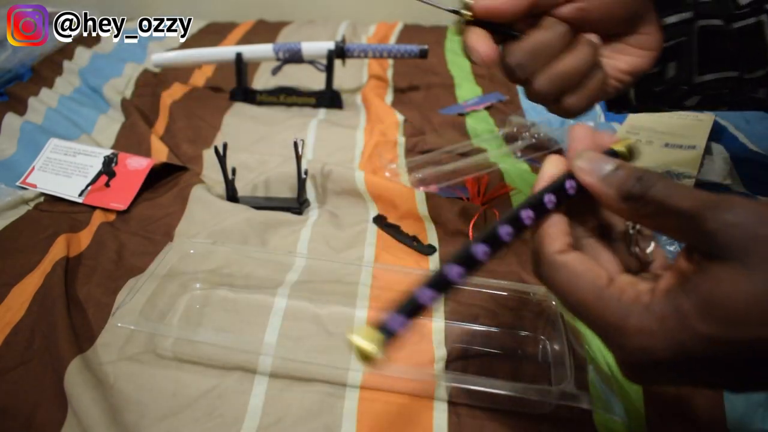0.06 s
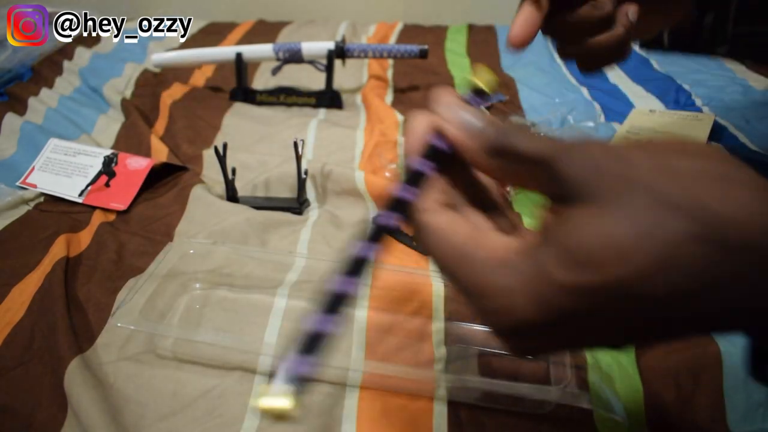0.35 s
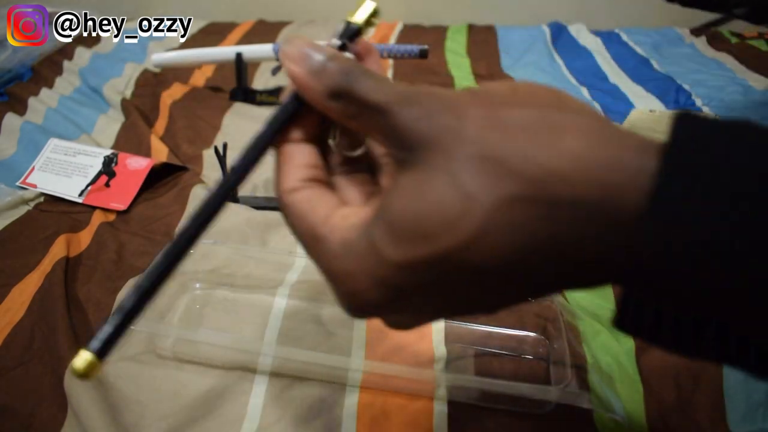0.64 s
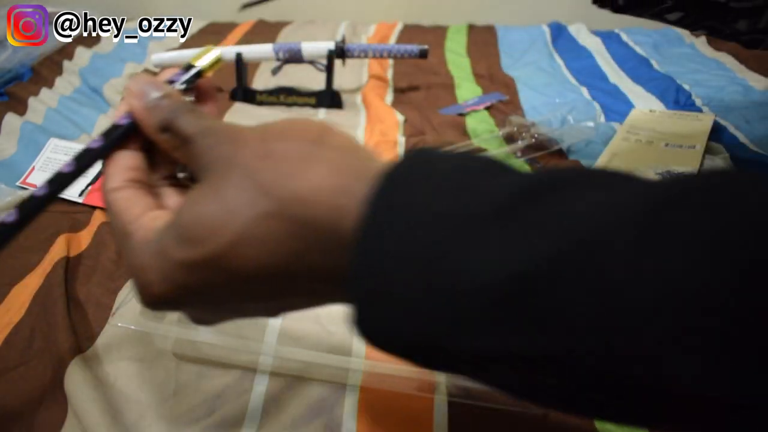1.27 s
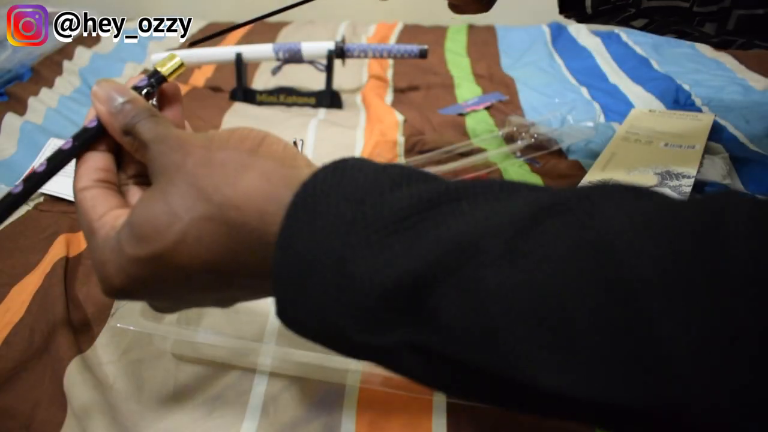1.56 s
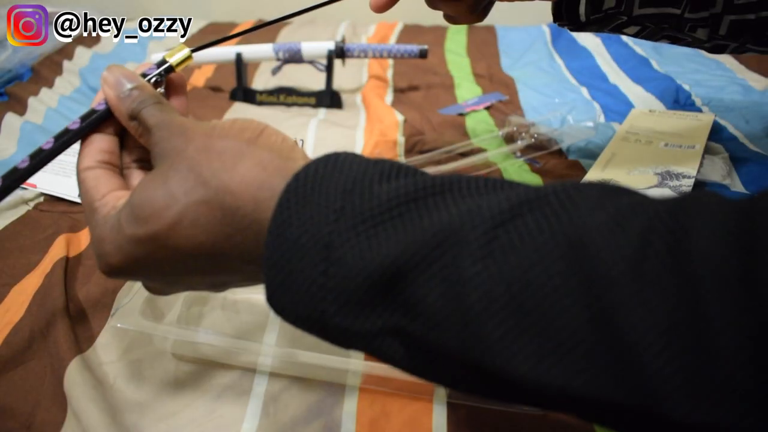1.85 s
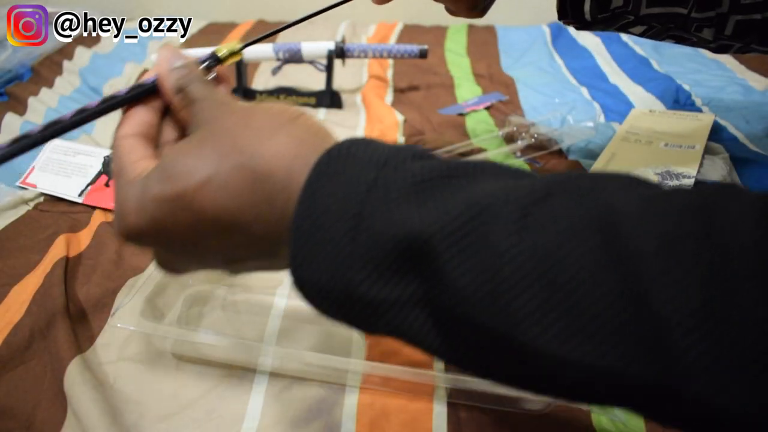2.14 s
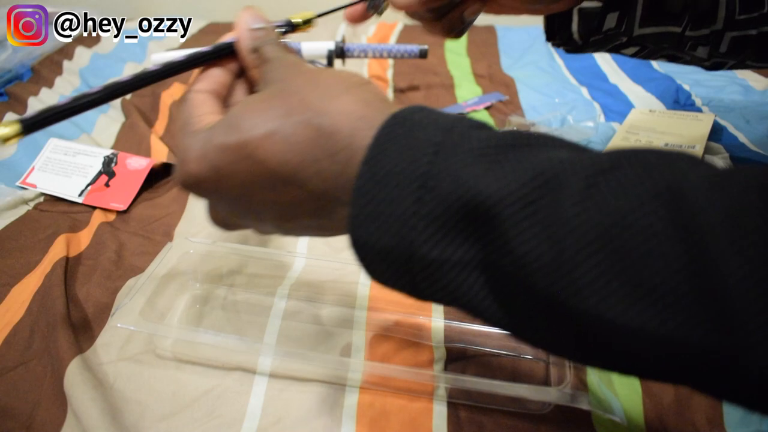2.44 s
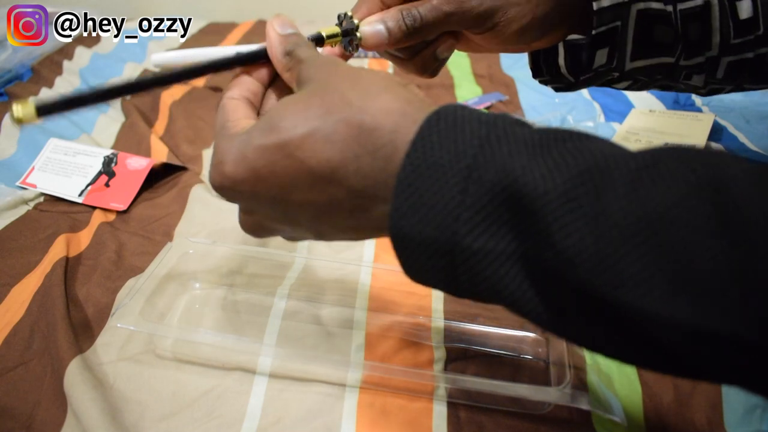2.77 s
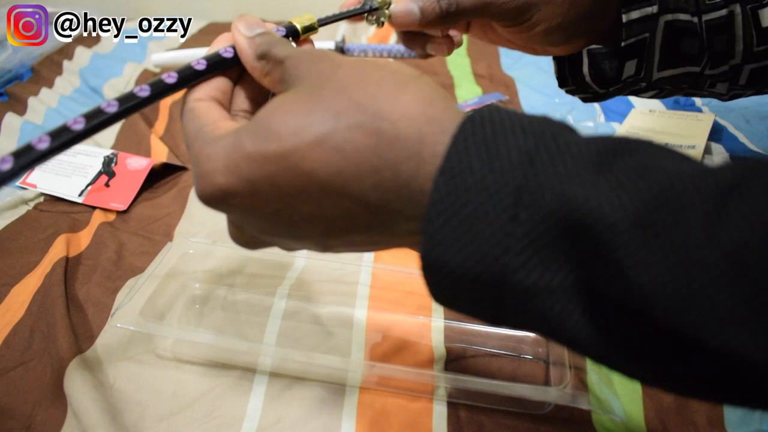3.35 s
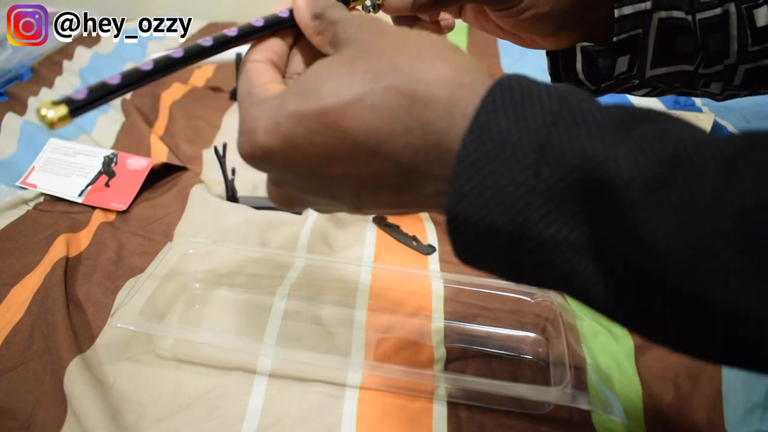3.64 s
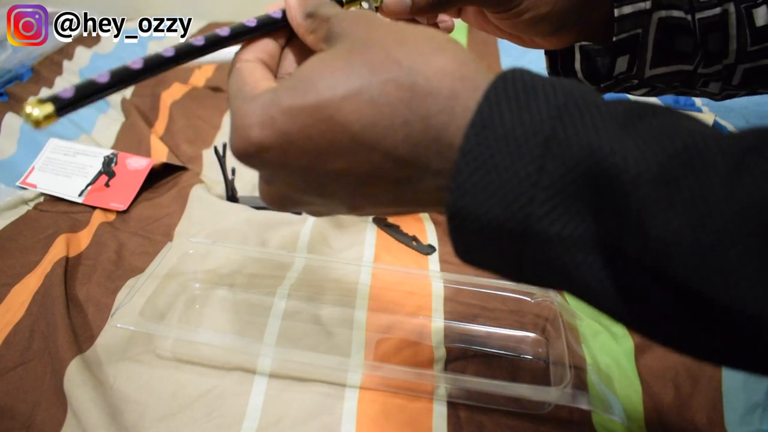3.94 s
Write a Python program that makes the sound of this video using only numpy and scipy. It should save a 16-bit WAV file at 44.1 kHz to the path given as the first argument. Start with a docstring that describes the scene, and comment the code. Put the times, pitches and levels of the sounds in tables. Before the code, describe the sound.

A miniature sword slides in and out of its scabbard, close up in a quiet room. Its fittings jingle at the start, followed by soft sleeve brushing and finger taps. The tip ticks around 1.8 seconds, then the blade scrapes in slowly, ringing thinly, and clacks home at 2.6. It scrapes out at 3.2, slides briskly back with a louder clack at 3.6, and clicks tight at 3.8.

```python
"""Sheathing a miniature sword

A tiny sword is handled close by, over a bed in a quiet room. Its fittings jingle, a sleeve brushes,
fingers tap the scabbard and the blade tip feels for the mouth. The blade scrapes home and seats with a
clack, is drawn, pushed home again, and clicks tight. Each knock is a burst of tiny collisions ringing
one part; each scrape is catch-and-slip friction through resonances that shift as the blade travels."""
import sys
import numpy as np
from scipy import signal
from scipy.fft import rfft, irfft
from scipy.io import wavfile
from scipy.ndimage import uniform_filter1d

SR = 44100
rng = np.random.default_rng(int(sys.argv[2]) if len(sys.argv) > 2 else 0)


def generate_wav(signal):
    """Clip the signal to [-1, 1] and save it as 16-bit WAV at the path in sys.argv[1]."""
    frames = np.transpose(np.atleast_2d(signal))
    scaled = np.clip(frames, -1, 1) * 32767
    pcm = np.round(scaled).astype(np.int16)
    wavfile.write(sys.argv[1], SR, pcm)


N = 176400


def amp(db):
    """Decibels to gain."""
    return 10 ** (np.asarray(db) / 20)


def unit(x):
    """Scales to rms 1."""
    return x / np.sqrt(np.mean(x ** 2) + 1e-20)


def read(points, hz):
    """Reads a curve on a log-frequency axis."""
    f, value = np.transpose(points)
    return np.interp(np.log(hz + 1), np.log(f + 1), value)


def envelope(points):
    """Gain from (time [s], level [dB]) points, silent outside them."""
    s, db = np.transpose(points)
    return amp(np.interp(np.arange(N) / SR, s, db, left=-200, right=-200))


def add(mix, s, sound):
    """Mixes a sound in at s seconds."""
    part = mix[max(round(s * SR), 0):][:len(sound)]
    part += sound[:len(part)]


def shade(x, points):
    """Equalises a sound by (frequency [Hz], gain [dB]) points."""
    size = x.shape[-1]
    return irfft(rfft(x) * amp(read(points, np.fft.rfftfreq(size, 1 / SR))), size)


def spread(pair, side_colour):
    """Left and right from a mid signal and a coloured side signal."""
    side = shade(pair[1], side_colour)
    return np.array([pair[0] + side, pair[0] - side])


def body(colour, modes, ripple_db, tilt=((1, 0), (2, 0)), size=4096, ripple_hz=200):
    """A part's impulse response: broad colour, main resonances and a random ripple of fine ones."""
    hz = np.fft.rfftfreq(size, 1 / SR)
    peaks = 0
    for centre, width, db in modes:
        skirt = np.exp(-((hz - centre) / (.5 * centre)) ** 2)
        peaks += (amp(abs(db)) ** 2 - 1) / (1 + (2 * (hz - centre) / width) ** 2) * skirt
    grain = np.hanning(round(ripple_hz / hz[1]))
    ripple = np.convolve(rng.standard_normal(len(hz)), grain, "same")
    ripple -= uniform_filter1d(ripple, size=3 * len(grain))
    ripple = 2 * np.tanh(unit(ripple) / 2)
    gain = amp(read(colour, hz) + read(tilt, hz) + ripple_db * ripple) * np.sqrt(1 + peaks)
    # Minimum phase: nothing rings before the strike
    cepstrum = irfft(np.log(gain))
    cepstrum[1:size // 2] *= 2
    cepstrum[size // 2 + 1:] = 0
    return irfft(np.exp(rfft(cepstrum)))


def chatter(decay_ms, rise_ms=.57, size=4096):
    """A dying burst of tiny collisions with an even spectrum and unit energy."""
    ms = np.arange(size) * 1000 / SR
    shape = (1 - np.exp(-(ms / rise_ms) ** 2)) * np.exp(-ms / decay_ms)
    spectrum = rfft(shape * rng.standard_normal(size))
    burst = irfft(spectrum / (abs(spectrum) + 1e-12)) * shape ** .25
    return burst / np.linalg.norm(burst)


def contacts(hits, colour, modes, width_hz, room_share=1, ripple_db=2.6, span_s=.0047):
    """Hits ring one part, each contact point favouring a resonance. Returns (close, room send)."""
    out = np.zeros((2, N))
    for s, db, decay_ms, bass_db, treble_db, hz, lift_db in hits:
        tilt = [(1400, bass_db), (2400, 0), (4200, 0), (8500, treble_db)]
        burst = chatter(decay_ms)
        # The room hears a part from all sides: a share below 1 softens its resonances there
        for path, share in zip(out, (1, room_share)):
            rings = np.array(modes + [(hz, width_hz, lift_db)]) * [1, 1, share]
            hit = signal.fftconvolve(burst, body(colour, rings, share * ripple_db, tilt))
            # db sets the rms the hit would have if packed into span_s
            add(path, s, amp(db) * hit / np.linalg.norm(hit) * np.sqrt(span_s * SR))
    return out


def catches(per_s=1500, spread_db=3):
    """Random tiny snags of uneven size, rms 1."""
    snags = (rng.random(N) < per_s / SR) * rng.choice([-1, 1], N)
    return unit(snags * amp(spread_db * np.minimum(rng.exponential(1, N), 4)))


def bandpass(x, low_hz, high_hz):
    """One band of a sound, rms 1."""
    return unit(signal.sosfilt(signal.butter(2, [low_hz, high_hz], "band", fs=SR, output="sos"), x))


def scrape(stroke, colour, modes, inward=True, room_share=.65, ripple_db=3.2, hop_s=.05):
    """The edge catches and slips; resonances sag as the blade goes deeper. Returns (close, room send)."""
    judder_db, swell_db = 1.36, 2.5
    sag_share, wander_share = .02, .008  # of each resonance's pitch
    rub = catches() + rng.standard_normal(N)  # equal parts snag and smooth hiss
    judder = bandpass(rng.standard_normal(N), 36, 144)
    force = unit(rub * amp(judder_db * judder)) * envelope(stroke)
    travel = np.interp(np.arange(N) / SR, [stroke[0][0], stroke[-1][0]], [0, 1])
    depth = travel if inward else 1 - travel
    hz, width, lift_db = np.transpose(modes)
    out, hop = np.zeros((2, N)), round(hop_s * SR)
    for at in range(0, N - 2 * hop, hop):
        # The contact point moves, so each grain rings a little differently
        wander, swell = np.clip(rng.standard_normal((2, len(modes))), -2, 2)
        moved_hz = hz * (1 + sag_share * (.5 - depth[at + hop]) + wander_share * wander)
        grain = force[at:at + 2 * hop] * np.sqrt(np.hanning(2 * hop))
        for path, share in zip(out, (1, room_share)):
            rings = zip(moved_hz, width / share, (lift_db + swell_db * swell) * (1 + share) / 2)
            ring = body(colour, rings, share * ripple_db, size=1024)
            add(path, at / SR, signal.fftconvolve(grain, ring / np.linalg.norm(ring)))
    return out


def room_tone(noise_db=-61, hum_hz=191, hum_db=-83):
    """Steady room noise with a faint hum."""
    # Colour of the noise and of its stereo side: (frequency [Hz], gain [dB])
    colour = [(10, -32), (30, -7), (60, -12), (92, -12.5), (140, -15.5), (190, -13), (270, -18.5),
              (451, -11), (887, -8), (1290, -10.5), (1610, -13.5), (2480, -15), (6560, -22.5), (16000, -34)]
    side_colour = [(30, -21), (100, -2.5), (300, -11.5), (1200, -6.5), (3000, 0), (8000, -1.5),
                   (15000, -1.5)]
    noise = unit(shade(rng.standard_normal((2, N)), colour))
    hum = unit(np.sin(2 * np.pi * hum_hz * np.arange(N) / SR))
    return amp(noise_db) * spread(noise, side_colour) + amp(hum_db) * hum


def hands(roughness_db=7.7, bump_s=1.175, bump_decay_s=.03):
    """Cloth and skin brush softly; the hand gives one dull bump."""
    # Swells of sleeve and fingers: (time [s], level [dB])
    swells = [(0, -62), (.15, -57.5), (.3, -50.5), (.48, -51), (.7, -67.5), (1.1, -88), (1.19, -49.5),
              (1.28, -72), (1.42, -59.5), (1.48, -46), (1.6, -66), (2.0, -60)]
    # Colour of the brushing and of the bump: (frequency [Hz], gain [dB])
    cloth_colour = [(100, -37), (300, -0.5), (600, 3.5), (1200, 6), (2500, 3), (5000, -6.5), (10000, -12),
                    (16000, -40)]
    bump_colour = [(10, -30), (35, -12), (70, 0), (200, -9), (400, -6), (700, -8), (1500, -25), (8000, -60)]
    friction = rng.standard_normal(N) * amp(roughness_db * rng.standard_normal(N))
    brush = unit(shade(friction, cloth_colour)) * envelope(swells)
    age = np.arange(N) / SR - bump_s
    bump = unit(shade(rng.standard_normal(N), bump_colour)) * (age > 0) * np.exp(-abs(age) / bump_decay_s)
    return brush + amp(-46.5) * bump


def fitting_jingle():
    """The fittings knock together with a bright, narrow ring."""
    # One quick cluster of clinks:
    # (time [s], level [dB], decay [ms], bass [dB], treble [dB], favoured ring [Hz], lift [dB])
    clinks = [(.0025, -34.5, 3.2, 5, 3, 3460, 12), (.0095, -40, 1.5, -5, 5, 7050, 10),
              (.0192, -37, 22, -9, 3, 3650, 18), (.0465, -31.5, 14, -10, 2.5, 5340, 19),
              (.065, -35.5, 13, -1, 3, 5460, 22.5)]
    # Colour of the fittings: (frequency [Hz], gain [dB])
    colour = [(300, -16), (1500, -13), (2500, 3), (6000, -1), (10000, -5.5), (12000, -9), (16000, -18)]
    # Their resonances: (frequency [Hz], width [Hz], lift [dB])
    modes = [(2400, 86, 9.5), (3510, 61, 9.5), (7000, 71, 13.5), (9400, 230, 19), (12000, 36, 8),
             (14370, 100, 5)]
    return contacts(clinks, colour, modes, width_hz=29)


def scabbard_taps():
    """Fingers tap the scabbard and its shell rings briefly."""
    # Light finger contacts:
    # (time [s], level [dB], decay [ms], bass [dB], treble [dB], favoured ring [Hz], lift [dB])
    taps = [(.196, -50, 2.4, 9, -4, 2380, 4.9), (.2795, -46, 3.9, -11, -23, 2370, 26),
            (.4698, -40, 2, -2, -2, 2470, 8.3), (.4865, -39, 14, -23, 4, 5000, 3),
            (.6085, -46, 1.6, -8, 11, 4200, 17), (.6262, -46, 11, -19, 10, 5300, 3.3),
            (1.167, -45.5, 2.9, -8, 1, 2450, 3), (1.178, -44.5, 3.2, -9, -26, 2400, 25),
            (1.326, -48, 2.3, 8, 4, 5300, 4), (1.346, -47.5, 1.1, 12, 7, 5300, 3.6),
            (1.44, -46, 5.3, 6, 0, 1100, 24), (1.4718, -41, 3.4, 2.5, 0, 1100, 24.7),
            (1.501, -44, 3.5, 11, -7, 1140, 18), (1.538, -50.5, 2.2, 14, 3, 4100, 3),
            (1.58, -51.5, 2.2, 17, 5, 7100, 4), (1.6775, -50, 2.8, -3, 2, 7100, 4),
            (1.694, -49, 2.3, 13, -13, 2400, 3), (3.0572, -48.5, 1.2, 4, -8, 3150, 16),
            (3.8915, -42.5, 2.9, 6, -17, 2100, 13)]
    # Colour of the shell: (frequency [Hz], gain [dB])
    colour = [(200, -42), (600, -28), (1300, -7), (2500, -4.5), (5000, -3.5), (8000, -11), (11000, -20),
              (16000, -39)]
    # Its resonances: (frequency [Hz], width [Hz], lift [dB])
    modes = [(2384, 180, 15), (4170, 110, 6), (5170, 310, 9.6), (7060, 140, 7.3)]
    return contacts(taps, colour, modes, width_hz=180)


def blade_ticks():
    """The blade ticks against the scabbard, first as its tip feels for the mouth."""
    # Contacts that ring the blade:
    # (time [s], level [dB], decay [ms], bass [dB], treble [dB], favoured ring [Hz], lift [dB])
    ticks = [(1.7168, -40.5, 1.8, -4, -7, 2240, 4.7), (1.761, -42.5, 17, 10, -11, 7050, 27),
             (1.7982, -26.5, 13, 2.5, 8, 13390, 8), (1.8514, -35, 1, 0, -2, 7430, 23),
             (1.8526, -32.5, 1.4, 6, -6, 3180, 19), (2.0688, -36.5, 0.98, 2, -11, 3350, 10),
             (2.079, -40, 1.5, 2, -29, 3270, 9.6), (2.1058, -36.5, 7.6, 11, 2.5, 8660, 21),
             (2.9988, -37.5, 1.3, 8, -8, 3240, 17), (3.1165, -44, 1.5, -3, 3, 9170, 18)]
    # Colour of the blade: (frequency [Hz], gain [dB])
    colour = [(300, -28), (800, -18), (1400, 1.5), (3000, 12.5), (5500, 4), (8500, 3.5), (12000, -5),
              (16000, -23)]
    # Its resonances: (frequency [Hz], width [Hz], lift [dB])
    modes = [(2350, 300, 4), (3670, 120, 9), (6891, 120, 7), (7450, 150, 4), (8600, 260, 9),
             (9986, 130, 10), (10850, 120, 10), (13390, 80, 16)]
    return contacts(ticks, colour, modes, width_hz=130)


def blade_pushes():
    """The blade rubs down the scabbard's bore twice, slowly and then briskly."""
    # Rubbing along each stroke: (time [s], level [dB])
    slow_stroke = [(2.03, -56), (2.06, -48.5), (2.125, -50.5), (2.19, -37.5), (2.26, -36.5), (2.29, -36.5),
                   (2.33, -36.5), (2.36, -33), (2.39, -38), (2.42, -35), (2.48, -36.5), (2.54, -32.5),
                   (2.58, -31), (2.6, -48)]
    brisk_stroke = [(3.415, -71), (3.437, -33), (3.47, -43), (3.51, -39), (3.555, -31.5), (3.58, -43),
                    (3.59, -55)]
    # Colour of the inward scrape: (frequency [Hz], gain [dB])
    colour = [(200, -59), (600, -19), (900, -4.5), (1200, -3), (1700, 1.5), (3200, 8.5), (4600, -4),
              (6200, -1.5), (9000, -8), (12000, -19), (16000, -20)]
    # Bore resonances when pushing: (frequency [Hz], width [Hz], lift [dB])
    modes = [(1225, 118, 8.8), (2180, 300, 3.6), (3020, 120, 6.4), (3700, 220, 8.2), (4000, 270, 12),
             (5020, 260, 9.4), (7070, 160, 13.2), (7600, 500, 7.2), (8770, 450, 12), (10000, 260, 4.3),
             (10800, 420, 11.4)]
    return scrape(slow_stroke, colour, modes) + scrape(brisk_stroke, colour, modes)


def blade_song(hz=9470, width_hz=380):
    """Snags at the tip keep one thin, high resonance of the bare blade ringing."""
    # The song swells until the scabbard damps it: (time [s], level [dB])
    swells = [(2.14, -56), (2.2, -44), (2.24, -49), (2.26, -58), (2.33, -46), (2.37, -48), (2.43, -62)]
    return bandpass(catches(), hz - width_hz / 2, hz + width_hz / 2) * envelope(swells)


def collar_knocks():
    """The collar rattles as the blade slides, and clacks as it seats."""
    # Knocks, seating clacks and the last tight click:
    # (time [s], level [dB], decay [ms], bass [dB], treble [dB], favoured ring [Hz], lift [dB])
    knocks = [(2.284, -27, 14, -8, -12, 3100, 13), (2.4152, -25.5, 3.8, -1, -6.5, 3650, 12),
              (2.4474, -26.5, 6, 3, -10, 3600, 5.6), (2.543, -25, 1.3, 8.5, -18, 3460, 14),
              (2.564, -29, 1.4, 0, -3, 3400, 8.3), (2.5772, -21, 0.77, -13, 2, 8270, 10),
              (2.5825, -24.5, 1.4, 6, -2, 3220, 5.1), (2.5848, -19, 1.2, -17, -5, 3300, 21.5),
              (2.5947, -26.5, 2.1, -7, 0, 3200, 24), (3.1524, -30, 13, -6, -7.5, 4400, 10.5),
              (3.1752, -28, 3.5, -1, -14, 4530, 6.8), (3.1875, -34, 9.3, 3, -17, 1720, 8.3),
              (3.2265, -29, 4, 7, -22, 3950, 9.4), (3.3435, -29.5, 7.4, 7, -14.5, 2180, 10),
              (3.4415, -28, 3.4, -22, -14, 6950, 20), (3.5708, -20.5, 3.6, -5, -5, 8700, 4),
              (3.5783, -16.5, 1.7, 1.5, 3, 4650, 25), (3.5803, -18, .9, 3.5, -6, 5140, 11),
              (3.5804, -18.5, 0.55, 1, -10, 1570, 16.5), (3.5846, -22.5, 2, 9.5, -1, 4550, 15),
              (3.6336, -27.5, 4, -5, -3, 4500, 3), (3.823, -23, 1.6, 4, -5, 3780, 13.4)]
    # Colour of the collar: (frequency [Hz], gain [dB])
    colour = [(200, -37), (500, -28), (900, -13.5), (1500, -3), (3000, 5.5), (6000, 4.5), (9000, 7),
              (12000, -2.5), (16000, -18)]
    # Its resonances: (frequency [Hz], width [Hz], lift [dB])
    modes = [(1620, 190, 3.1), (3600, 240, 2.5), (5160, 140, 6.4), (6730, 330, 4), (8650, 890, 3),
             (10320, 130, 8.9)]
    return contacts(knocks, colour, modes, width_hz=184, room_share=.6)


def blade_draw():
    """The blade scrapes out in one short pull, the bore's resonances rising slightly."""
    # Rubbing along the pull: (time [s], level [dB])
    stroke = [(3.18, -49), (3.19, -29), (3.21, -31), (3.228, -36.5), (3.245, -33.5), (3.275, -31),
              (3.29, -39.5), (3.32, -50), (3.37, -48)]
    # Colour of the outward scrape: (frequency [Hz], gain [dB])
    colour = [(200, -33), (500, -18), (900, -5), (1600, -5), (3500, 0.5), (6000, -8), (8000, -1),
              (10000, -7), (13000, -9), (16000, -26)]
    # Bore resonances when drawing: (frequency [Hz], width [Hz], lift [dB])
    modes = [(1680, 210, 14), (2195, 170, 15.2), (3030, 160, 14.2), (4020, 360, 10.7), (4580, 270, 9),
             (5060, 300, 14), (6650, 250, 12), (9000, 250, 3.5)]
    return scrape(stroke, colour, modes, inward=False)


def direct(x):
    """The close sound reaches the two microphones slightly differently in the treble."""
    # Stereo side of the close sound: (frequency [Hz], gain [dB])
    side_colour = [(200, -73), (2500, -23.5), (5000, -14.5), (8500, -10.5), (15000, -3)]
    smeared = signal.oaconvolve(x, chatter(decay_ms=.98))[:N]
    return spread([x, smeared], side_colour)


def bedroom(x, gap_s=.0041, size=32768):
    """A bedroom's diffuse tail, wider in the treble."""
    # Reverb time: (frequency [Hz], time to fall 60 dB [s])
    t60 = [(200, 1), (1000, 0.55), (3000, 0.39), (6000, 0.42), (10000, 0.3), (16000, 0.36)]
    # Stereo side of the tail: (frequency [Hz], gain [dB])
    side_colour = [(200, -29), (1300, -84), (2500, -14), (4400, -11.5), (8000, -9), (15000, -1)]
    hz, t, noise = signal.stft(rng.standard_normal((2, size)), SR, nperseg=256)
    decay = amp(-60 * t / read(t60, hz)[:, None])
    tail = signal.istft(noise * decay, SR, nperseg=256)[1]
    tail *= np.clip(np.arange(tail.shape[1]) / SR / gap_s - .5, 0, 1)  # soft pre-delay
    stereo_tail = spread(tail / np.linalg.norm(tail[0]), side_colour)
    return signal.fftconvolve(x[None], stereo_tail, axes=1)[:, :N]


def scene():
    """Sword and hands up close, with bedroom reverb and room tone."""
    hits = fitting_jingle() + scabbard_taps() + blade_ticks() + collar_knocks()
    slides = blade_pushes() + blade_song() + blade_draw()
    close, room_send = amp(-5.5) * hits + amp(-4.5) * slides + amp(-9) * hands()
    return direct(close) + amp(-8.5) * bedroom(room_send) + room_tone()


def record(dry):
    """Two microphones with slightly unequal treble, a band limit and the converter's small offset."""
    # Microphone balance: (frequency [Hz], left minus right [dB])
    balance = [(200, 0), (2400, -0.5), (4400, 0), (8500, -0.8), (11000, -1.5), (13000, 3), (16000, -3)]
    cutoff_hz, dc_offset = 15900, -.0029
    left = shade(dry[0], [(hz, db / 2) for hz, db in balance])
    right = shade(dry[1], [(hz, -db / 2) for hz, db in balance])
    lowpass = signal.firwin(511, cutoff_hz, window=("kaiser", 9), fs=SR)
    return signal.oaconvolve(np.array([left, right]), lowpass[None], "same") + dc_offset


dry = scene()
out = record(dry)
generate_wav(out)
```